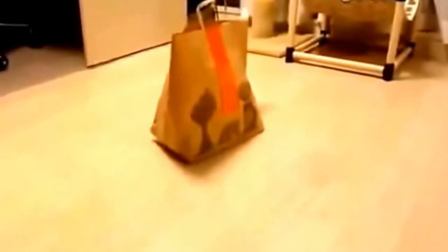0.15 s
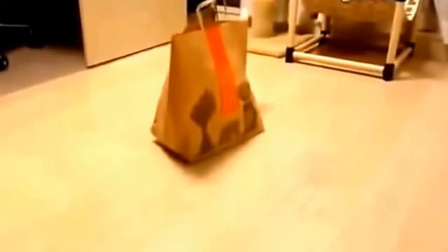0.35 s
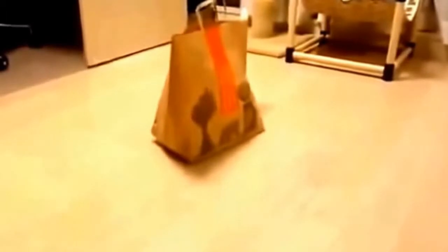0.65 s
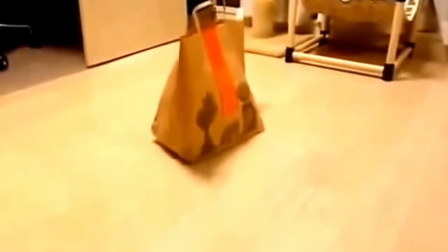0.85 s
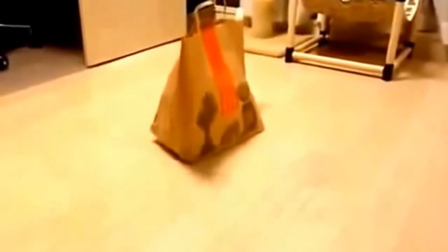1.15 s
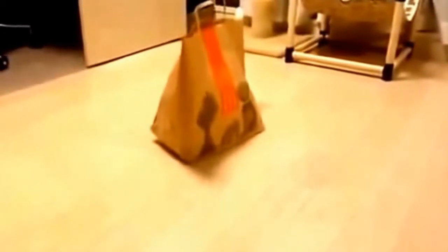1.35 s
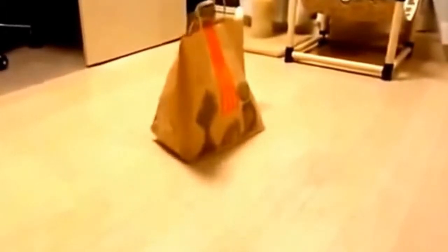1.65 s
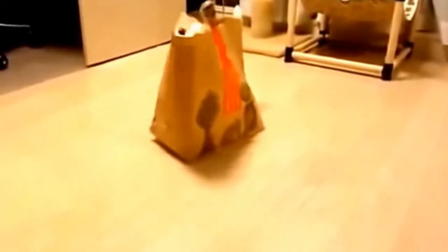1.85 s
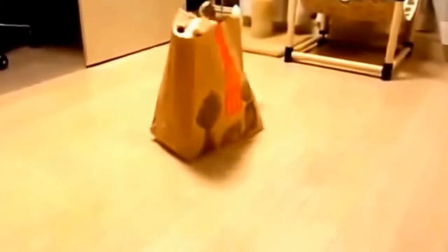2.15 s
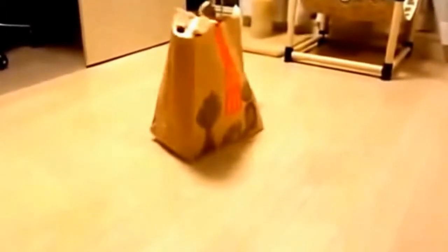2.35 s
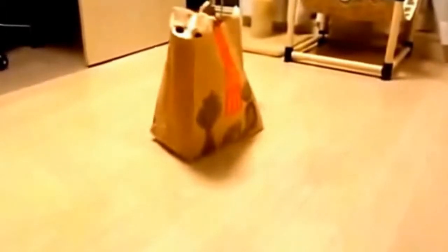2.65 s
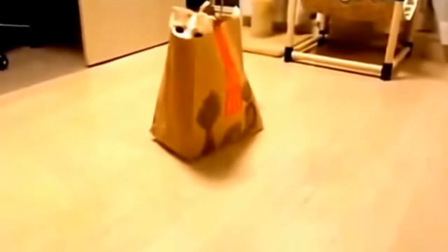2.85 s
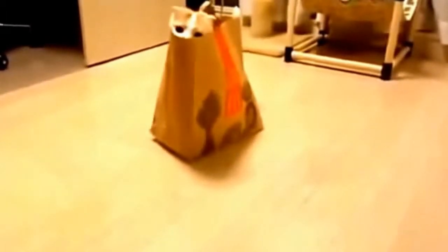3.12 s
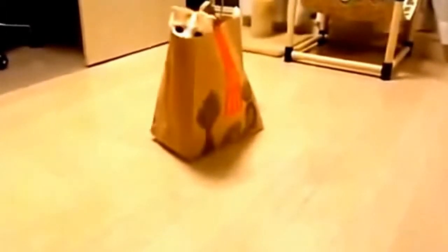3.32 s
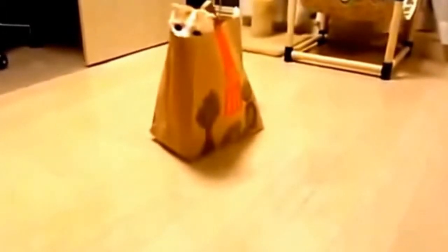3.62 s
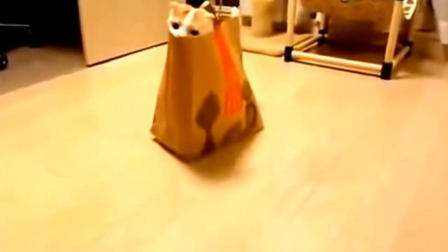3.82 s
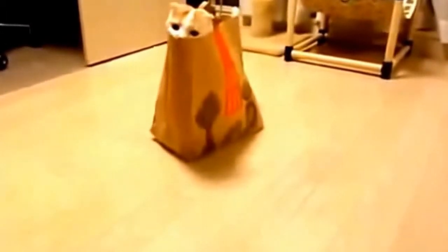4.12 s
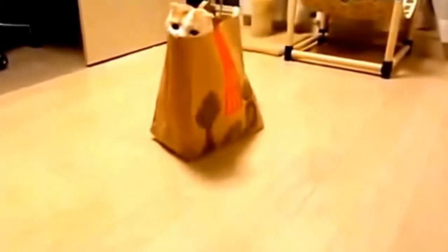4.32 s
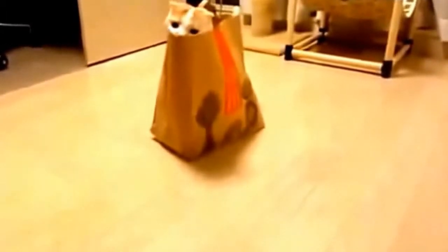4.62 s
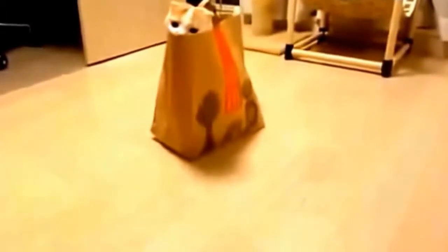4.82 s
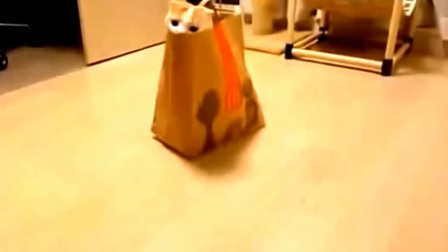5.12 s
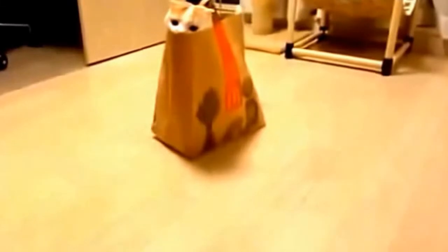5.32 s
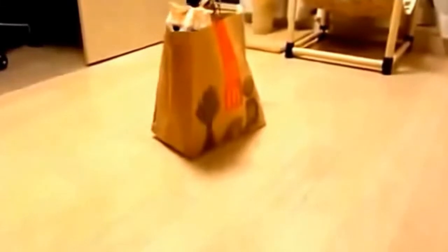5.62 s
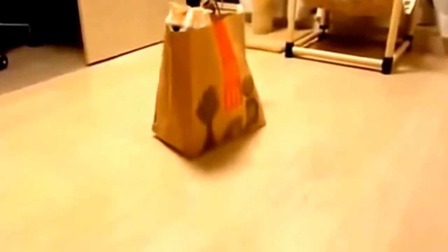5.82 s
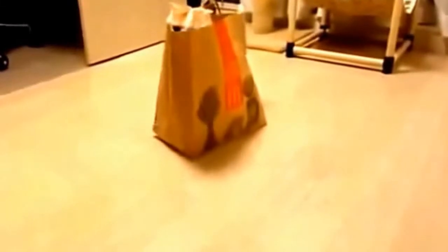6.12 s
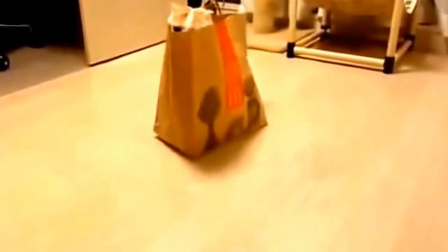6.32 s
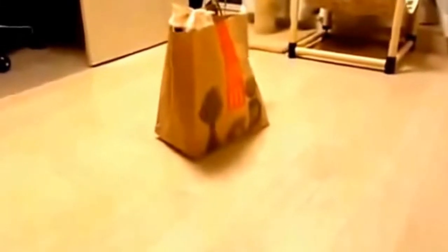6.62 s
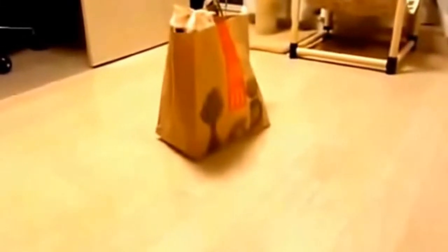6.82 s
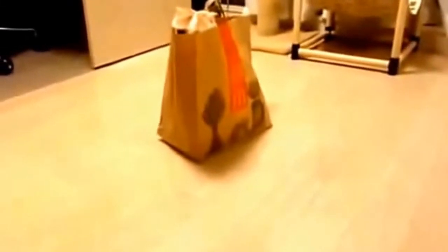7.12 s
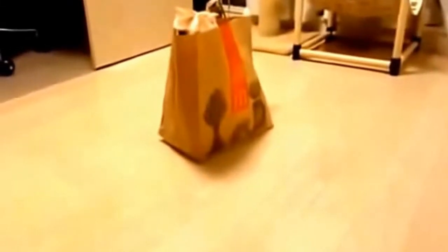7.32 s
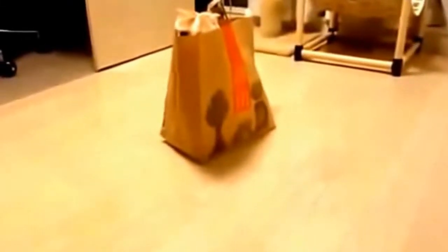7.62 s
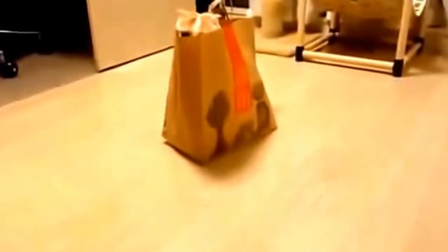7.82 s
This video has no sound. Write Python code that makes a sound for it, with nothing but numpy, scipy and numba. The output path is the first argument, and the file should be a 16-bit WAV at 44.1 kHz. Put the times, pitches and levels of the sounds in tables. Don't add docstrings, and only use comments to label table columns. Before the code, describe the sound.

Paper bag crinkles in short bursts with hollow panel pops and crisp snaps as a cat moves inside it, in a quiet room.

```python
import sys
import numpy as np
from scipy import signal
from scipy.fft import rfft, irfft, next_fast_len
from scipy.io import wavfile
from scipy.ndimage import uniform_filter1d
from numba import njit

SR = 44100
rng = np.random.default_rng(int(sys.argv[2]) if len(sys.argv) > 2 else 0)


def volts_from_db(level):
    exponent = np.asarray(level, float) / 20
    return 10 ** exponent


def wav_record(signal):
    frames = np.transpose(np.atleast_2d(signal))
    bounded = np.clip(frames, -1, 1)
    quanta = np.round(bounded * 32767).astype(np.int16)
    wavfile.write(sys.argv[1], SR, quanta)


N = 350947

# frequency in Hz, density in dB per Hz.
HOUSE_SPECTRUM = [(12, -56), (20, -17), (59, -15.5), (91, -3), (146, -9), (233, -14.5), (260, -16),
                  (290, -10.5), (472, -13), (728, -11.5), (857, -14.5), (1500, -24.5), (1950, -53),
                  (3300, -120)]
# frequency in Hz, density in dB per Hz.
HISS_SPECTRUM = [(900, -22), (1500, 0), (2500, -4), (4500, -8.5), (7000, -11.5), (10000, -9.5),
                 (13000, -12), (15000, -18)]
# frequency in Hz, density in dB per Hz.
HOUSE_SIDE_SPECTRUM = [(12, -40), (20, -14), (89, -1), (180, -6), (540, -6.5), (2410, -10.5), (3340, -10),
                       (4180, -13), (7800, -19), (10100, -46), (17200, -120)]
HOUSE_DB, HISS_DB, HOUSE_SIDE_DB = -50.5, -60.5, -60
# frequency in Hz, width in Hz, level in dB.
HUM_MODES = [(87.96, 2.75, -58.5), (120.2, 6, -62), (372.4, 11.7, -65.5), (480, 51, -62),
             (551.8, 22, -64.5), (715.8, 24, -62)]

# peak in seconds, level in dB, panel pitch in Hz, rise in seconds, fall in seconds.
LEANS = [(.15, -49.5, 570, .005, 0.23), (.752, -45.5, 416, 0.1, 3.9), (1.06, -36.5, 480, 0.012, 0.65),
         (1.14, -36.5, 447, .05, 1.4), (1.23, -43, 520, .03, 0.068), (1.27, -41, 436, 0.011, 0.31),
         (1.88, -34, 540, 0.0056, 0.05), (2.5, -43.5, 454, 0.13, 2.5), (2.668, -38.5, 500, 0.29, 0.34),
         (2.958, -46, 382, 0.23, 0.094), (3.91, -39, 425, 0.086, 0.6), (4.075, -32.5, 407, 0.012, 0.098),
         (4.21, -30.5, 500, .02, 0.19), (4.3, -37.5, 425, 0.88, 0.17), (4.905, -44, 610, 0.0056, .6),
         (5.106, -32, 600, 0.0043, 2.5), (5.16, -33.5, 680, 0.094, 0.19), (5.358, -38.5, 533, .01, 0.28),
         (5.854, -18, 670, 0.018, 0.055), (6.062, -44.5, 490, 0.66, 1.5), (6.135, -40, 412, 0.3, 0.14),
         (6.229, -36, 410, .005, 2.5), (6.3, -38, 447, .05, 1.7), (6.399, -38.5, 596, .1, 0.15),
         (6.522, -38, 560, 0.0064, 0.12), (6.8, -39, 690, 0.0037, 0.11)]
# peak in seconds, level in dB, brightness in dB, rise in seconds, fall in seconds.
CRUMPLES = [(.152, -53, 11.5, 0.003, 0.3), (.168, -53, 10.5, .02, 0.08), (1.062, -39, -10, 0.036, 0.1),
            (1.13, -46, -5, .05, .3), (1.175, -42, -6, .06, 0.11), (1.2, -43, -3, .02, 0.17),
            (1.27, -51, 2, .05, 0.22), (1.885, -44.5, -22, 0.017, 0.12), (2.534, -52.5, -2, 0.14, 1.5),
            (2.668, -42, -10, 0.25, 0.27), (3.91, -52, -7, 0.043, 0.063), (4.09, -39, -9.5, 0.05, 0.11),
            (4.212, -51, 7, 0.045, 0.15), (4.328, -46, -7, 0.12, 0.18), (4.908, -44.5, -10, 0.0058, 0.21),
            (4.971, -44.5, -3, 0.006, 0.087), (5.108, -30.5, -2.5, .005, 1.5),
            (5.153, -27, -1.5, 0.051, 0.095), (5.2, -32.5, -2, .05, 0.16),
            (5.362, -32.5, -15, 0.0046, 0.11), (5.421, -39, -6, 0.0089, 0.12),
            (5.462, -43.5, -5.5, 0.0053, 0.11), (5.816, -45.5, -4.5, .004, 1.5),
            (5.842, -37, 1.5, 0.0037, .5), (5.85, -30.5, 1, 0.01, 0.091), (6.06, -44.5, -8, .05, .3),
            (6.079, -36.5, -1, 0.006, 0.16), (6.14, -39, -5, .03, .12), (6.2, -47, -8, .05, .5),
            (6.25, -35, -2, 0.044, 0.46), (6.312, -37.5, -3.5, .008, 0.26), (6.378, -37, -3.5, .02, 0.13),
            (6.519, -41, -7, 0.0042, 0.057), (6.812, -39.5, -4.5, .02, .12)]
# peak in seconds, level in dB, rise in seconds, fall in seconds.
BRUSHES = [(.15, -65, .005, .2), (.75, -61, .1, 3.8), (1.065, -46.5, 0.11, .25), (1.19, -46, 0.14, .4),
           (1.27, -43, .02, 0.19), (2.534, -46.5, 0.086, 0.64), (2.958, -66, .1, .1),
           (3.632, -57.5, 0.23, .08), (3.91, -56.5, .1, 0.14), (4.08, -47.5, 0.055, .18),
           (4.212, -48.5, 0.05, 1.2), (4.328, -47, 0.43, 0.2), (4.93, -57.5, .04, 1.2),
           (5.09, -49.5, 0.062, 1.2), (5.105, -29, 0.0056, 0.13), (5.195, -35.5, .04, 0.16),
           (5.434, -56, 0.16, 0.27), (5.83, -49, 0.12, 0.22), (6.077, -49, 0.24, 2.7),
           (6.247, -36, 0.041, 0.21), (6.803, -48, .006, .3), (6.83, -48.5, 0.04, 0.21)]
# centre in Hz, width in Hz.
RUB_BANDS = [(1400, 1030), (3500, 3230), (9500, 6700)]
SWING_DB = 20
BRUSH_SPILL_DB = -6
FACET_HZ, FACET_SPREAD_DB, FACET_DB = 1585, 3, -9
FACET_S = 1 / 45

# start in seconds, peak in dB, crease pitch in Hz, upper band and top band in relative dB.
SNAPS = [(0.1508, -34, 2780, -4, -26), (1.0596, -23, 1880, -9, -23), (2.9168, -41, 1390, -16, -16),
         (4.085, -27, 1460, -7, -24), (4.31, -33, 1270, -2, -17), (5.1045, -11.5, 1560, 0.5, -5),
         (5.1546, -12, 2370, -18, -10), (5.192, -16, 2850, -12, 5), (5.251, -25, 1150, -14, -12),
         (5.422, -27, 1500, -4, -25), (5.8152, -31, 1570, -14, -9), (5.8463, -20, 2110, 6, -25),
         (6.079, -27, 1330, 6.5, -8), (6.244, -13, 1450, -0.5, -0.5), (6.3757, -18.5, 2700, -21, -25),
         (6.5205, -23.5, 1890, -10, -26), (2.79, -34.5, 2000, -1, -12), (6.799, -36, 1720, -2.5, -16),
         (6.814, -23, 1830, -15, -31)]
# start in seconds, peak in dB, pitch in Hz, upper band and top band in relative dB.
TICKS = [(.1515, -33, 2900, -2, -18), (.1605, -36, 2300, 0.1, -18), (.1665, -36, 3300, 0.1, -18),
         (1.1909, -27, 2200, 2, -12), (2.6191, -37, 1500, -6, -12), (2.6406, -30, 1350, -8, -16),
         (3.8937, -41, 1300, -6, -13), (4.2155, -36, 1900, -8, -16), (4.9082, -32, 2880, -9, -28),
         (4.9684, -33, 1100, -9, -22), (5.107, -10, 2700, -1, -10), (5.1455, -19, 1100, -1, -14),
         (5.15, -16, 1390, -1, -14), (5.1537, -16, 1500, -1, -14), (5.16, -21, 2000, -3, -14),
         (5.1918, -16, 2850, 0.1, 12), (5.227, -18, 2400, -1, -8), (5.4187, -19.5, 1000, -5, -20),
         (5.9902, -26, 1300, -9, -16), (6.078, -20, 2400, 1, -12), (6.2287, -26, 1460, -6, -10),
         (6.2468, -16, 2200, -4, -10), (6.2544, -22, 1600, 1, -10), (6.271, -21, 1500, 4, -10),
         (6.31, -21, 1200, -7, -16), (6.375, -26, 3200, -3, -24), (6.52, -28, 2900, -5, -25),
         (2.9165, -36, 1500, -6, -16), (5.8155, -35, 2000, -2, -12), (6.8, -33, 1300, -3, -12)]
# start in seconds, peak in dB, fold pitch in Hz.
FOLDS = [(1.875, -38, 1450), (4.9078, -26.5, 1790), (4.9694, -27, 1950), (5.1287, -19, 1470),
         (5.3603, -22, 1700), (5.461, -27, 2200), (5.8487, -28, 1630), (5.854, -14, 2210),
         (6.2664, -19.5, 2330), (6.3087, -29, 1820), (6.368, -19, 1270)]
FOLD_UPPER_DB, FOLD_TOP_DB = -32, -32
CRACK_S, TICK_S, FOLD_S = 0.0041, 0.0011, 0.0081

# start in seconds, peak in dB, pitch in Hz.
CHIMES = [(.1515, -51, 1600), (.152, -46, 2150), (.152, -48, 2800), (.1525, -46, 3400), (1.058, -38, 2050),
          (1.074, -35, 2050), (1.875, -42, 1480), (4.09, -34, 1470), (4.1, -41, 2000), (4.909, -40, 2870),
          (4.97, -35.5, 1020), (5.128, -25, 1450), (5.244, -28.5, 1080), (5.36, -24.5, 1610),
          (5.361, -29, 2190), (5.461, -41, 2100), (6.138, -32.5, 1290), (6.374, -27, 3200)]
# start in seconds, peak in dB, panel pitch in Hz.
FREE_POPS = [(.816, -32, 422), (.887, -30.5, 390), (.997, -27.5, 365), (1.06, -27, 446), (1.268, -23, 305),
             (1.276, -27.5, 335), (1.228, -32, 550), (1.287, -22.5, 453), (1.365, -35, 366),
             (2.454, -39, 590), (2.875, -34, 380), (3.87, -34.5, 392), (4.222, -21.5, 520),
             (4.036, -34, 480), (4.386, -32.5, 447), (4.911, -33, 593), (5.843, -30.5, 690),
             (6.014, -34, 480), (6.114, -30, 347), (6.37, -23.5, 662), (6.33, -27, 376), (6.531, -30, 548),
             (6.548, -39, 610), (6.571, -41, 616), (4.929, -29.5, 547), (4.984, -36, 804), (.153, -40, 655),
             (2.84, -39, 560), (6.0, -37, 250)]
# start in seconds, peak in dB, panel pitch in Hz.
HELD_POPS = [(.769, -35.5, 503), (1.083, -31, 610), (1.302, -40, 420), (1.318, -44, 400), (1.873, -30, 537),
             (2.495, -36.5, 593), (2.602, -32.5, 386), (2.675, -26.5, 370), (2.777, -24.5, 420),
             (2.916, -35, 480), (3.892, -27, 360), (4.046, -40, 406), (4.07, -25, 350), (4.083, -22.5, 307),
             (4.313, -21.5, 454), (4.401, -31.5, 353), (4.97, -35, 740), (5.108, -29.5, 393),
             (5.42, -29.5, 846), (5.857, -16, 728), (6.1255, -24, 392), (6.229, -20, 396), (6.34, -35, 393),
             (6.799, -30.5, 713), (6.813, -33, 606)]
# start in seconds, peak in dB, panel pitch in Hz.
KNOCKS = [(1.0645, -29.5, 520), (2.462, -37, 450), (2.508, -35.5, 520), (2.648, -32, 500),
          (2.706, -36, 900), (2.95, -34, 330), (1.1905, -20, 537), (1.2035, -21, 475), (1.209, -22.5, 480),
          (4.194, -20.5, 480), (4.204, -16, 504), (4.209, -19.5, 530), (4.2155, -14.5, 514),
          (4.252, -27, 520), (4.908, -31.5, 600), (5.111, -23, 704), (5.8415, -30, 720),
          (5.862, -21.5, 806), (6.085, -30, 910), (6.311, -23, 680), (6.321, -30, 480), (6.354, -29.5, 370),
          (6.381, -24, 740), (6.5205, -22, 613)]
CHIME_T60_S, CHIME_PUSH_S = 0.029, 0.002
FREE_T60_S, FREE_PUSH_S = 0.093, 0.0046
HELD_T60_S, HELD_PUSH_S = 0.038, 0.0046
KNOCK_T60_S, KNOCK_PUSH_S = 0.023, 0.0026
# frequency in Hz, width in Hz, level in dB.
WALL_MODES = [(520, 38, -21.5), (788, 26, -6), (1058, 85, -2), (1450, 19, -8), (2210, 70, -9.5),
              (2870, 89, -26)]

# start in seconds, peak in dB, pitch in Hz, length in seconds.
SQUEAKS = [
    (1.062, -46, 5400, .045),
    (4.308, -42, 2750, .014),
]
# start in seconds, peak in dB, pitch in Hz.
THUDS = [(1.267, -41, 280), (2.599, -55, 220), (5.104, -46, 176), (5.16, -48, 205), (4.6, -50, 165),
         (5.9, -55, 190), (5.36, -53, 213), (1.19, -48, 202), (5.42, -50.5, 210), (2.46, -52.5, 220),
         (1.29, -52, 190), (4.194, -43, 220), (5.849, -46, 152), (5.25, -52, 230), (5.7, -46, 129)]

# frequency in Hz, decay time T60 in seconds, tail against direct sound in dB.
ROOM = [(154, 0.22, -1), (396, 0.16, -7), (870, 0.47, -9), (2700, 0.63, -9), (5660, 0.11, -12),
        (10700, 0.082, -5.5)]
# frequency in Hz, level against the sum in dB.
BAG_SIDE = [(100, 2), (300, -24), (700, -18), (1300, -2.5), (2400, 1), (4400, 5.5), (7000, 6), (9000, -1),
            (12000, -4)]

# frequency in Hz, level in dB.
MASK = [(7000, -55), (7900, -3.5), (8300, -54), (11000, -23), (13500, -27), (14600, -16.5), (15250, 12)]
# frequency in Hz, share from 0 to 1.
SPECKS = [(8000, .6), (9600, .35), (11500, .1), (13000, .8), (14800, .9)]
STEREO_GATE_DB = -64
TOP_HZ, SEAM_HZ = 15150, 7950


def level(x, db):
    return x * volts_from_db(db) / np.sqrt(np.mean(x ** 2))


def ring(x, hz, width_hz):
    return signal.lfilter(*signal.iirpeak(hz, hz / width_hz, fs=SR), x)


def colour(x, points):
    hz, db = np.transpose(points)
    size = next_fast_len(len(x))
    f = np.maximum(np.arange(size // 2 + 1) * SR / size, 1)
    gain = volts_from_db(np.interp(np.log(f), np.log(hz), db))
    return irfft(rfft(x, size) * gain, size)[:len(x)]


def walk(rate):
    k = int(SR / rate)
    steps = np.repeat(rng.standard_normal(N // k + 1), k)
    return 1.3 * uniform_filter1d(uniform_filter1d(steps, k), k)[:N]


def add(out, s, grain, peak_db):
    i = int(s * SR)
    grain = grain[:N - i]
    out[i:i + len(grain)] += grain * volts_from_db(peak_db) / np.abs(grain).max()


def house():
    rumble = level(colour(rng.standard_normal(N), HOUSE_SPECTRUM), HOUSE_DB - 2.5)
    hiss = level(colour(rng.standard_normal(N), HISS_SPECTRUM), HISS_DB)
    mid = rumble * volts_from_db(.5 * walk(2.02)) + hiss * volts_from_db(.5 * walk(4.0))
    for hz, width, db in HUM_MODES:
        mode = ring(ring(rng.standard_normal(N), hz, width), hz, 2 * width)
        mid = mid + level(mode, db)
    side = level(colour(rng.standard_normal(N), HOUSE_SIDE_SPECTRUM), HOUSE_SIDE_DB)
    return mid, side


def moves(rows):
    t = np.arange(N) / SR
    db, tint = np.full(N, -200.), np.full(N, 1. * rows[0][2])
    for row in rows:
        rise, fall = row[-2], row[-1]
        late = t - row[0]
        own = row[1] - SWING_DB * np.where(late < 0, -late / rise, late / fall)
        wins = (late >= 0) | (own > db)
        db[wins], tint[wins] = own[wins], row[2]
    return db, tint


@njit
def glide(x, hz, damping):
    y, b, l = np.empty(len(x)), 0., 0.
    for i in range(len(x)):
        g = np.tan(np.pi * hz[i] / SR)
        v = (b + g * (x[i] - l)) / (1 + g * (g + damping))
        b, l, y[i] = 2 * v - b, l + 2 * g * v, damping * v
    return y


def crackle(per_s, spread_db):
    out, where = np.zeros(N), rng.random(N)
    hit = where < per_s / SR
    out[hit] = volts_from_db(-spread_db * np.log(1e-4 + where[hit] * SR / per_s))
    return out * rng.choice([-1., 1.], N)


def facets():
    hold = int(FACET_S * SR)
    pitch = np.repeat(rng.standard_normal(N // hold + 1), hold)[:N]
    hz = np.clip(FACET_HZ * volts_from_db(FACET_SPREAD_DB * pitch), 500, 6000)
    tones = glide(glide(crackle(1200, 1.7), hz, 0.13), hz, 0.54) / np.sqrt(hz)
    return level(tones, FACET_DB)


def rubbing():
    lean_db, lean_hz = moves(LEANS)
    crumple_db, bright_db = moves(CRUMPLES)
    brush_db, _ = moves(BRUSHES)
    low_gain = volts_from_db(crumple_db)
    upper_gain = np.hypot(volts_from_db(crumple_db + bright_db), volts_from_db(brush_db + BRUSH_SPILL_DB))
    gains = [low_gain, upper_gain, volts_from_db(brush_db)]
    shared = level(crackle(300, 1.9), 0)
    slips = 0.45 * shared + level(crackle(900, 1.5), 0)
    boom = glide(glide(slips, lean_hz, 1.0), lean_hz, 1.43) / np.sqrt(lean_hz)
    out = level(boom, -4.0) * volts_from_db(lean_db + 2.3 * walk(30))
    for gain, (hz, width) in zip(gains, RUB_BANDS):
        slips = 0.29 * shared + level(crackle(1.5 * hz, 1.25), 0)
        band = ring(ring(ring(slips, hz, 1.33 * width), hz, 1.85 * width), hz, 2.1 * width)
        out += level(band, -5.0) * gain * volts_from_db(1.5 * walk(60))
    return out + facets() * low_gain


def snaps():
    out, t = np.zeros(N), np.arange(2048) / SR
    rows = [(*snap, CRACK_S) for snap in SNAPS]
    rows += [(*fold, FOLD_UPPER_DB, FOLD_TOP_DB, FOLD_S) for fold in FOLDS]
    rows += [(*tick, TICK_S) for tick in TICKS]
    for s, db, hz, upper_db, top_db, length in rows:
        crack = rng.standard_normal(len(t)) * np.exp(-t / length)
        fold = ring(crack, hz, .35 * hz) + .5 * ring(crack, 2200, 2400)
        fold = ring(ring(fold, hz, 0.81 * hz), 1300, 3900)
        upper = ring(ring(ring(crack, 4300, 2000), 4600, 3000), 5600, 3800)
        top = ring(ring(crack, 9700, 6000), 10700, 7000)
        add(out, s, fold, db - 8.0)
        add(out, s, upper, db + upper_db - 11.5)
        add(out, s, top, db + top_db - 10.0)
    return out


def pops(rows, t60, push):
    out, t = np.zeros(N), np.arange(4096) / SR
    width = np.log(1000) / np.pi / t60
    for s, db, hz in rows:
        force = rng.standard_normal(len(t)) * np.exp(-t / push)
        force[0] += 14
        panel = ring(force, hz, width)
        neighbour = 0.27 * ring(force, 1.48 * hz, 2.4 * width)
        bag_air = .5 * ring(force, 319, 140)
        body = panel + neighbour + bag_air
        add(out, s, ring(ring(body, hz, 0.66 * hz), hz, 2.8 * hz), db - 0.5)
    return out


def walls(x):
    return x + sum(volts_from_db(db) * ring(x, hz, width) for hz, width, db in WALL_MODES)


def squeaks():
    out = np.zeros(N)
    for s, db, hz, length in SQUEAKS:
        shape = np.hanning(int(length * SR))
        whistle = ring(ring(rng.standard_normal(4096), hz, 90), hz, 200)
        add(out, s, whistle[-len(shape):] * shape, db)
    return out


def thuds():
    out, t = np.zeros(N), np.arange(8192) / SR
    for s, db, hz in THUDS:
        add(out, s, np.sin(2 * np.pi * hz * t) * np.exp(-t / 0.012), db + 8.5)
    return out


def room_tail(gap):
    t = np.arange(SR // 2) / SR
    tail = 0
    for hz, t60, db in ROOM:
        fade = np.clip((t - gap) / 0.0014, 0, 1) * np.exp(-np.log(1000) * t / t60)
        band = ring(rng.standard_normal(len(t)), hz, 0.77 * hz)
        tail = tail + band * fade * volts_from_db(db) / np.sqrt(np.sum(fade ** 2))
    return tail


def scene():
    paper = rubbing() + snaps()
    paper += pops(CHIMES, CHIME_T60_S, CHIME_PUSH_S)
    paper += pops(FREE_POPS, FREE_T60_S, FREE_PUSH_S)
    paper += pops(HELD_POPS, HELD_T60_S, HELD_PUSH_S)
    paper += pops(KNOCKS, KNOCK_T60_S, KNOCK_PUSH_S)
    bag = walls(paper) + squeaks() + thuds()
    mid = bag + signal.fftconvolve(bag, room_tail(0.008))[:N]
    side = colour(signal.fftconvolve(bag, room_tail(0.00017))[:N], BAG_SIDE)
    air_mid, air_side = house()
    mid, side = mid + air_mid, side + air_side
    return np.array([(mid + side) * volts_from_db(-0.23), (mid - side) * volts_from_db(-0.68)])


def thin_treble(mid, side):
    hz, _, z = signal.stft([mid, side], SR, nperseg=2048)
    hz = hz[:-1]
    power = np.abs(z[:, :1024]) ** 2
    band = np.repeat(power.reshape(2, 64, 16, -1).mean(axis=2), 16, axis=1)
    midrange = power[0, (hz > 1000) & (hz < 6000)].mean(axis=0)
    mask = volts_from_db(np.interp(hz, *np.transpose(MASK), left=-200))[:, None] ** 2 * midrange
    stereo = np.where(hz > SEAM_HZ, volts_from_db(2 * STEREO_GATE_DB), 1e-30)[:, None]
    z[:, :-1] *= np.clip(band / np.array([mask, stereo + 0 * mask]), 0, 1) ** 4
    share = np.interp(hz, *np.transpose(SPECKS), left=0)[:, None]
    speckled = np.repeat(rng.random(band[0, ::16].shape), 16, axis=0) < share
    sign = rng.choice([-1, 1], speckled.shape)
    sparse = rng.random(speckled.shape) < .15
    z[1, :-1] += 1.27 * z[0, :-1] * speckled * sign * sparse
    return signal.istft(z, SR, nperseg=2048)[1][:, :N]


def low_pass(x):
    return signal.sosfilt(signal.butter(12, 15940, fs=SR, output="sos"), x)


def record(dry):
    dry = signal.sosfilt(signal.ellip(10, .3, 80, TOP_HZ, fs=SR, output="sos"), dry)
    mid, side = (dry[0] + dry[1]) / 2, (dry[0] - dry[1]) / 2
    dipped = mid - 0.55 * ring(mid, SEAM_HZ, 240)
    mid, side = thin_treble(dipped, side)
    return low_pass(np.array([mid + side, mid - side]))


dry = scene()
out = record(dry)
wav_record(out)
```